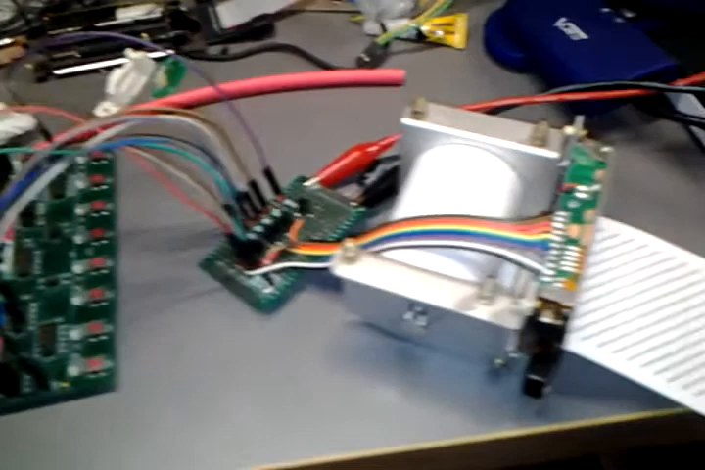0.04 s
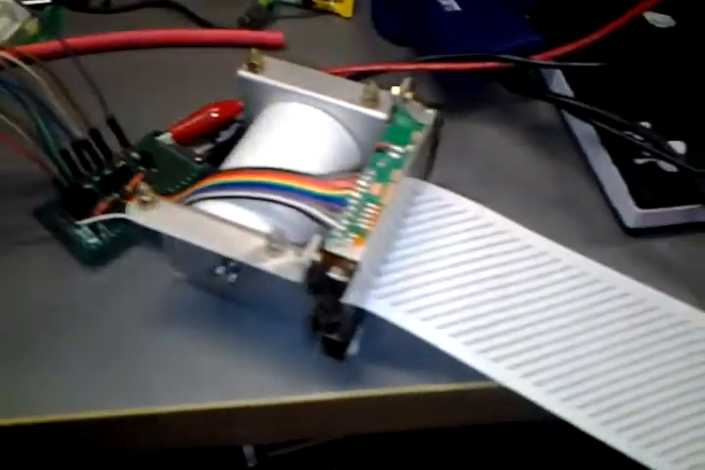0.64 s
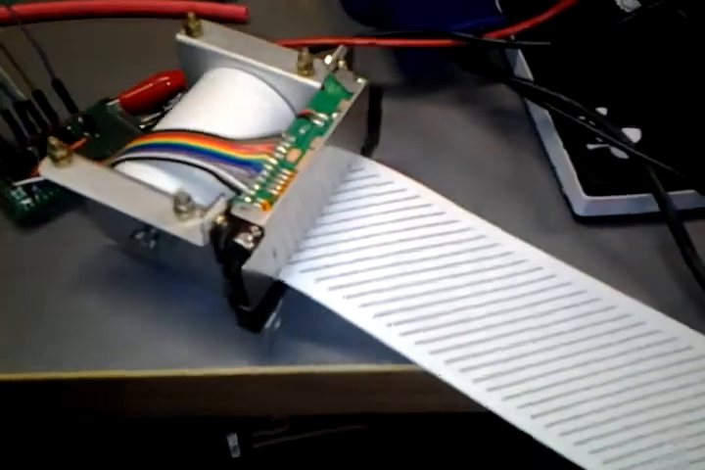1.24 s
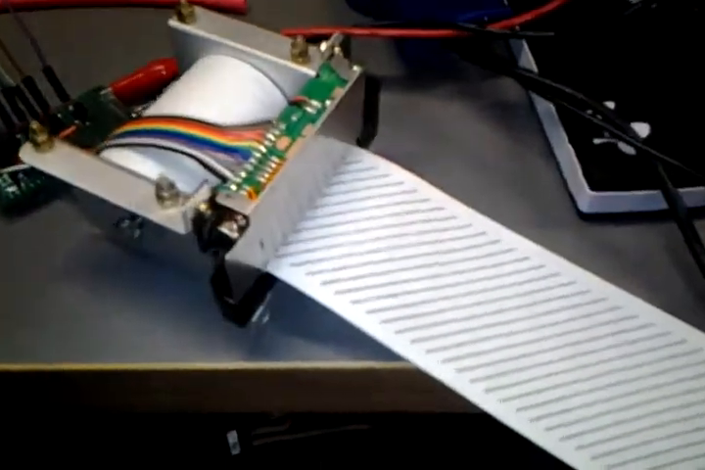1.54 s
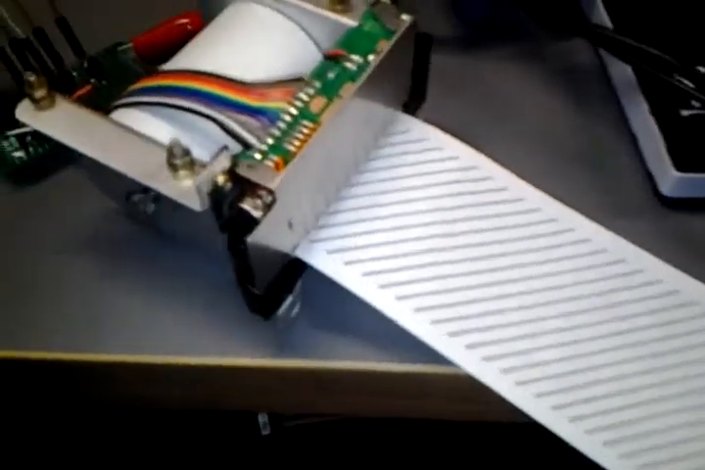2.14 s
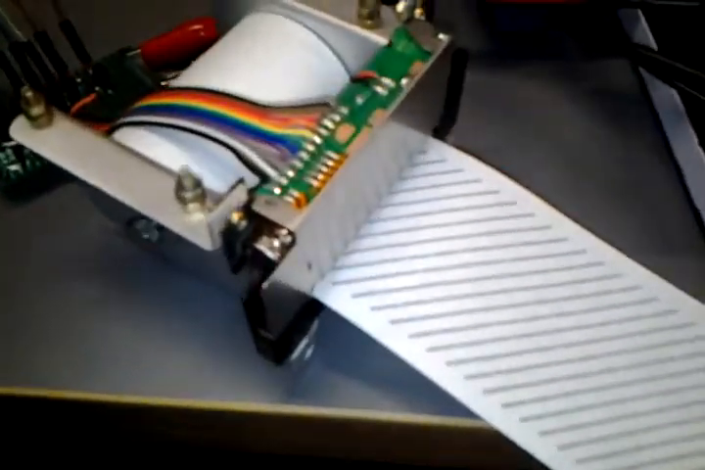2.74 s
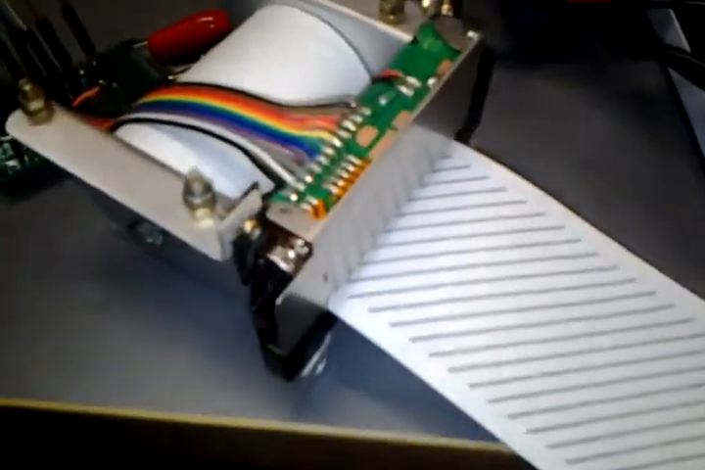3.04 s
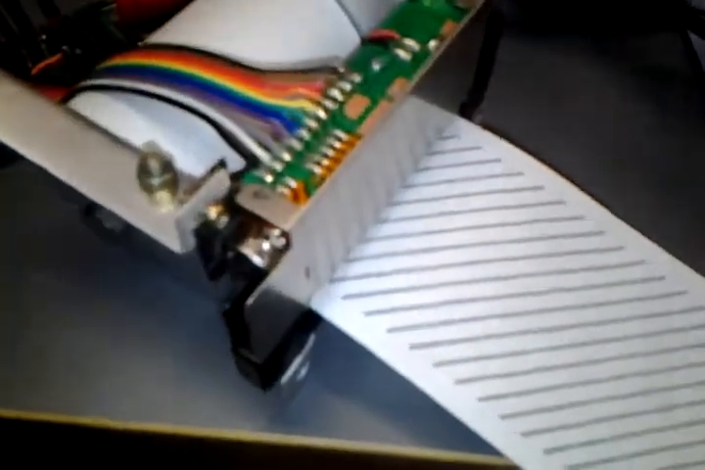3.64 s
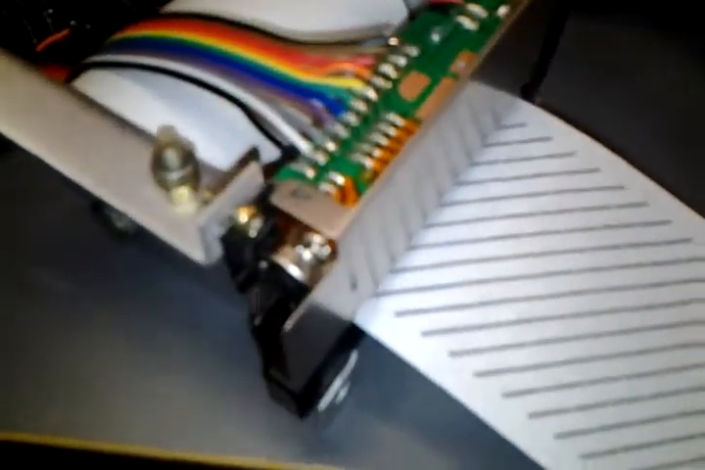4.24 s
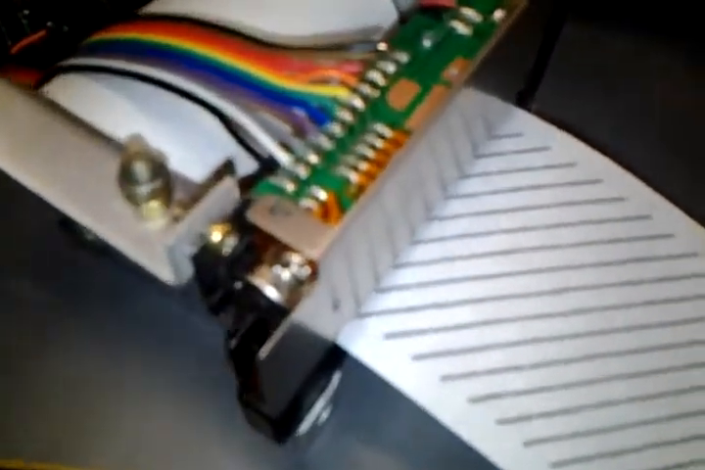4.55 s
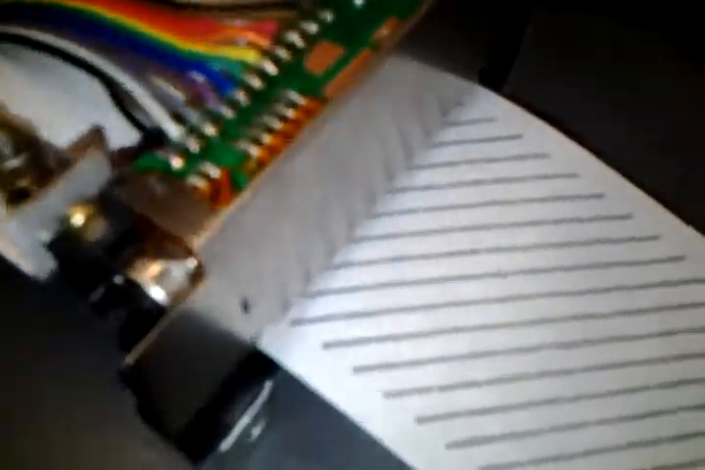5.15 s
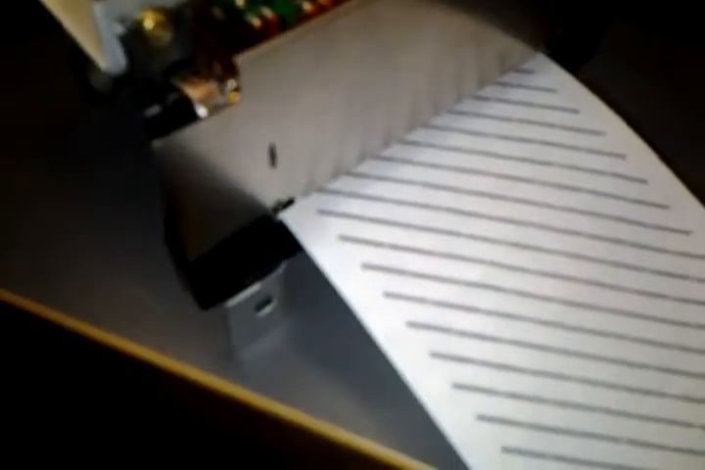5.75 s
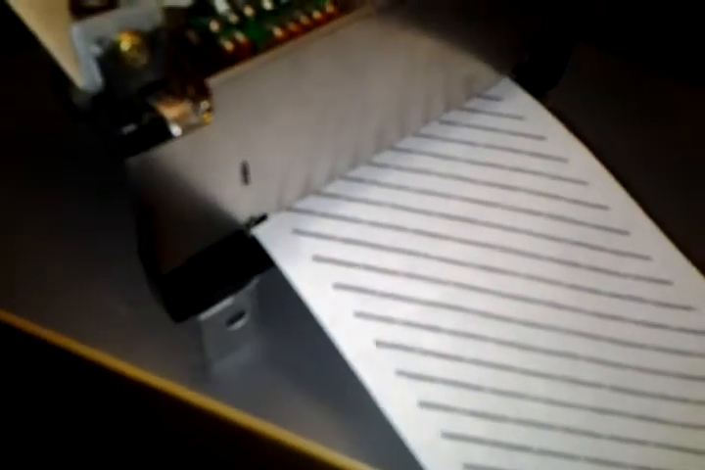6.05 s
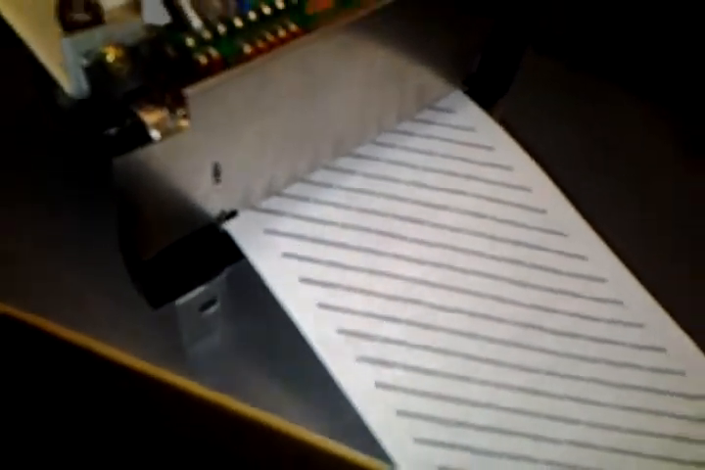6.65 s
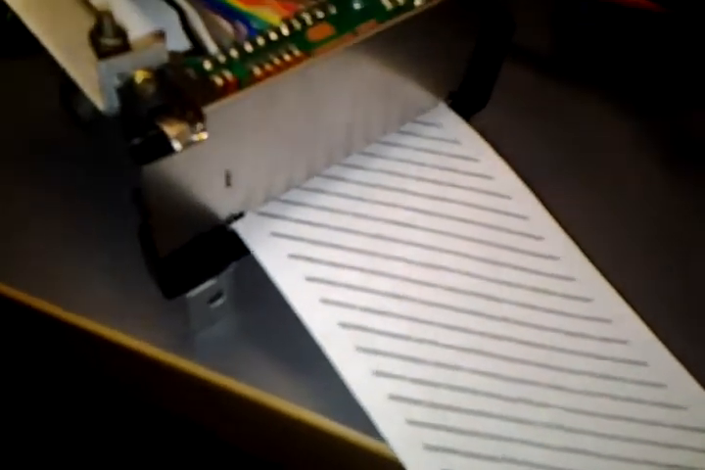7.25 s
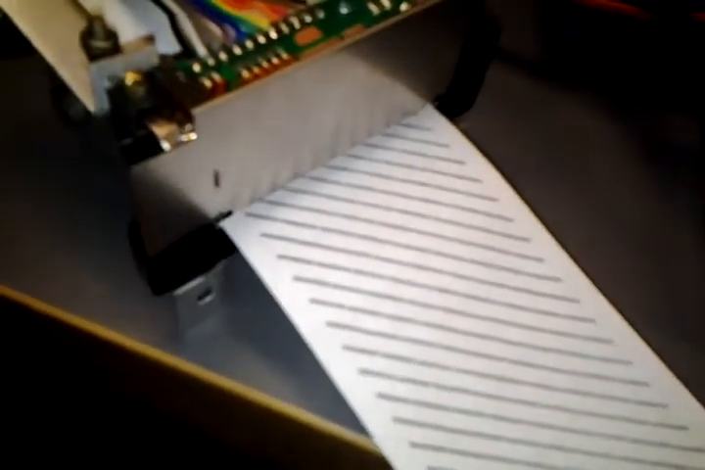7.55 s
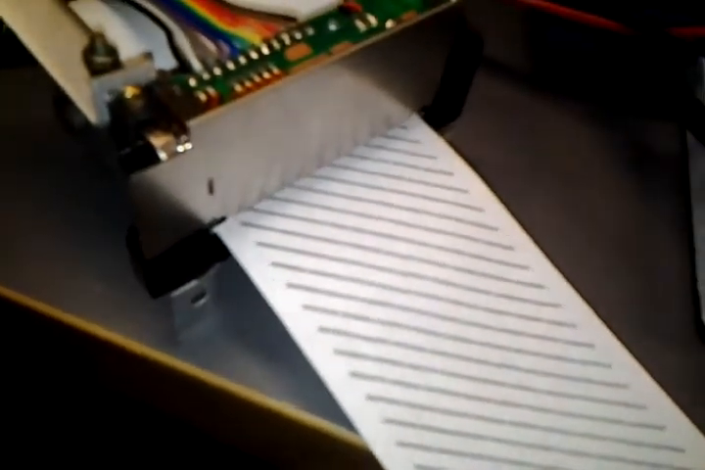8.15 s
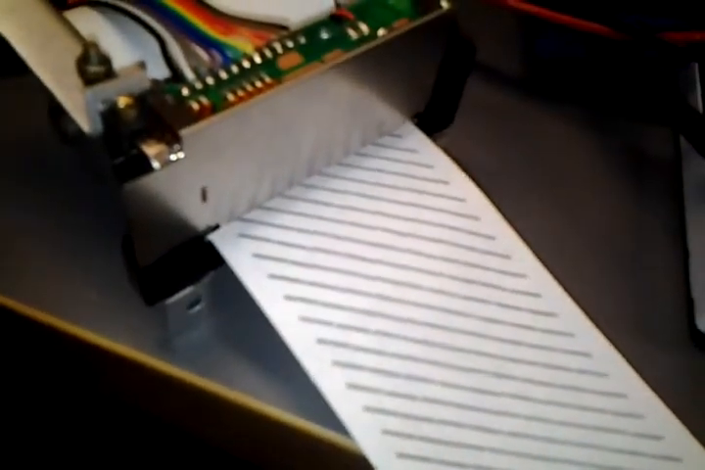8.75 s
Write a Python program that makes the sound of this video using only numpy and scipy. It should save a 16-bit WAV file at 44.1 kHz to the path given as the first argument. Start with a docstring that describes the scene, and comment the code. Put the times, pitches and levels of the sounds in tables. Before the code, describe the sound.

A small dot-matrix printer buzzes in rapid, regular metallic bursts, close by, over a faint motor hum.

```python
"""A small shuttle dot-matrix printer on a workbench, printing diagonal stripes on till paper.
Four solenoids on a swaying shuttle fire in turn: each dot line is a buzz of needle strikes that ring
the metal frame. The gears whine as the shuttle swings back, a pawl clicks the paper on, the motor hums.
The microphone is handheld, close by and wandering closer, with bench echoes and a faint room behind."""
import sys
import numpy as np
from scipy import signal
from scipy.fft import rfft, irfft
from scipy.io import wavfile

SR = 44100
rng = np.random.default_rng(int(sys.argv[2]) if len(sys.argv) > 2 else 0)


def unload_wav(signal):
    """Save mono or channel-first audio to the path in sys.argv[1] as 16-bit WAV at rate SR, clipped to [-1, 1]."""
    wavfile.write(
        sys.argv[1],
        SR,
        np.round(np.clip(np.atleast_2d(signal).T, -1, 1) * 32767).astype(np.int16),
    )


N = 388080
TIME = np.arange(N) / SR

# the microphone moving in on the printer: time_s, closeness (0 far, 1 close), level_db
MICROPHONE_PATH = [(0, 0, -4), (.8, 0.18, -4), (1.8, 0.61, -1), (2.8, .67, 0.1), (4, 0.69, 0.43),
                   (5, .8, .9), (5.9, 0.97, 1.4), (7, 0.84, .5), (8.8, .87, 0.95)]


def from_db(db):
    """Decibels to gain."""
    return 10 ** (np.asarray(db) / 20)


def rms_one(x):
    """Scale to an rms of 1."""
    return x / np.sqrt(np.mean(x ** 2) + 1e-20)


def at_hz(points, values, hz):
    """A spectrum read on a log-frequency axis."""
    return np.interp(np.log(hz + 1e-9), np.log(points), values)


def drift(rate_hz):
    """A random wander with an rms of 1."""
    knots = rng.standard_normal(4096)
    return rms_one(np.interp(TIME * rate_hz, np.arange(len(knots)), knots))


def resonance(x, hz, t60):
    """One ringing mode with a gain of 1 at its peak."""
    r = from_db(-60 / (t60 * SR))
    feedback = [1, -2 * r * np.cos(2 * np.pi * hz / SR), r * r]
    return signal.lfilter(np.array([1, 0, -1]) * (1 - r * r) / 2, feedback, x + 1e-18)


def place(times, sounds):
    """Lay short sounds, one a row, on the time line."""
    at = (times * SR).astype(int)[:, None] + np.arange(sounds.shape[1])
    inside = (at >= 0) & (at < N)
    return np.bincount(at[inside], sounds[inside], N)


def causal(level_db):
    """Minimum-phase spectra for rows of levels: nothing sounds before the blow."""
    cepstrum = irfft(np.log(from_db(level_db)))
    half = cepstrum.shape[1] // 2
    cepstrum[:, 1:half] *= 2
    cepstrum[:, half + 1:] = 0
    return np.exp(rfft(cepstrum))


def along_paper(across, count, size=13):
    """Smooth random shapes over the paper's width, of spread about 1, read where each needle lands."""
    angle = np.pi * np.arange(1, size)[:, None] * across
    return (rng.standard_normal((count, size - 1)) @ np.cos(angle)).T * np.sqrt(2 / size)


def line_starts(first_s=-0.01615, period_s=0.18278, count=49):
    """One dot line for each turn of the shuttle cam."""
    # the motor runs a little ahead of or behind its beat: time_s, late_ms
    lateness = [(0, .6), (.6, -.25), (2.9, .6), (4.4, -.2), (5.3, -1.4), (6.2, -1), (6.7, .2), (8.1, 1.1),
                (8.8, .2)]
    beat = first_s + period_s * np.arange(count)
    return beat + np.interp(beat, *np.transpose(lateness)) / 1000


def room(x, bench_t60=0.03, room_t60=0.198, tail_db=-10, first_echo_s=0.00065, positions=14):
    """Dense echoes off the cluttered bench and a faint room tail, shifting as the microphone moves."""
    t, out = TIME[:SR // 3], 0
    reached_s = np.linspace(0, TIME[-1], positions)
    for position in np.eye(positions):
        near, far = rng.standard_normal((2, len(t)))
        bench = rms_one(near * from_db(-60 * t / bench_t60))
        tail = from_db(tail_db) * rms_one(far * from_db(-60 * t / room_t60))
        echoes = (bench + tail) * np.clip(t / first_echo_s - 1, 0, 1)
        heard_here = x * np.sqrt(np.interp(TIME, reached_s, position))
        out = out + signal.oaconvolve(heard_here, echoes / np.linalg.norm(echoes))[:N]
    return out


def motor(whirr_db=-40, flutter=0.19, hum_waver=0.003, whirr_follows=0.42):
    """A fluttering whirr over wavering hum lines; the balance shifts as the microphone closes in."""
    # noise spectrum of motor and gear train: frequency_hz, level_db
    whirr_spectrum = [(25, 1.5), (60, -1), (160, -5.5), (250, 0), (350, 2.5), (395, 8), (470, -3),
                      (700, 3.5), (1100, 2), (1900, -0.5), (3100, -1), (4200, -6.5), (6300, -5),
                      (8000, -27.5)]
    # steady hum: pitch_hz, far_rms_db, close_rms_db
    hum_lines = [(119, -66, -65), (397, -51.5, -59.5), (439, -55.5, -60.5)]
    hz = np.arange(N // 2 + 1) * SR / N
    colour = from_db(at_hz(*np.transpose(whirr_spectrum), hz))
    whirr = rms_one(irfft(rfft(rng.standard_normal(N)) * colour, N))
    time_s, closeness, level_db = np.transpose(MICROPHONE_PATH)
    close = np.interp(TIME, time_s, closeness)
    whirr_gain = from_db(whirr_db + whirr_follows * np.interp(TIME, time_s, level_db))
    out = whirr_gain * whirr * (1 + flutter * drift(150))
    for pitch_hz, far_db, close_db in hum_lines:
        phase = 2 * np.pi * np.cumsum(pitch_hz * (1 + hum_waver * drift(11))) / SR
        out += np.sqrt(2) * from_db(far_db + (close_db - far_db) * close) * np.sin(phase)
    return out


def pawl(delay_s=0.1628, uneven_db=2, dull_hz=3800):
    """The paper feed clicks once between lines: a dulled impulse rings two short modes."""
    times = line_starts() + delay_s
    clicks = place(times, from_db(-31 + uneven_db * rng.standard_normal((len(times), 1))))
    clicks = signal.sosfilt(signal.butter(2, dull_hz, fs=SR, output="sos"), clicks)
    return 24 * resonance(clicks, hz=3350, t60=0.00063) + 16 * resonance(clicks, hz=1380, t60=0.006)


def gear_whine(trim_db=-1, waver=0.03566, rough=0.55):
    """The gears sing upward as the unloaded shuttle swings back, and sink as it is caught."""
    # the whine through one return stroke: since_line_start_s, pitch_hz, swell_db
    return_stroke = [(.112, 1248, -19), (0.127, 1352, -7), (.136, 1777, -9), (0.144, 1850, -2),
                     (.148, 1920, 0), (.154, 2100, -2.5), (.159, 1936, -12), (.165, 1611, -28.5)]
    # how strongly the whine reaches the microphone: time_s, level_db
    pickup = [(0, -38), (1.1, -34), (2.1, -39.5), (2.6, -36), (4.3, -29.5), (5.4, -29), (5.9, -35.5),
              (7.5, -37), (8.1, -32), (8.8, -40)]
    start = line_starts()
    line_db = np.interp(start, *np.transpose(pickup))
    line = np.maximum(np.searchsorted(start, TIME) - 1, 0)
    since = TIME - start[line]
    stroke_s, pitch_hz, swell_db = np.transpose(return_stroke)
    phase = 2 * np.pi * np.cumsum(np.interp(since, stroke_s, pitch_hz) * (1 + waver * drift(90))) / SR
    gain = from_db(trim_db + line_db[line] + np.interp(since, stroke_s, swell_db))
    # uneven teeth scratch the tone
    return gain * ((1 + rough * drift(500)) * np.sin(phase) + rough * drift(500) * np.cos(phase))


def frame(times, cracks, across, shape_share=0.45, drive_samples=160):
    """The strikes ring the frame; how strongly a mode answers depends on where the needle lands."""
    # modes of the metal frame: pitch_hz, level_db, t60_s
    modes = [(565, -1, 0.055), (708, 3.5, 0.043), (1258, -6.5, 0.033), (1390, -2, 0.029),
             (1604, -6.5, 0.028), (1660, -4, 0.055), (1812, -5, 0.036), (1860, -5, 0.049), (1999, 1, 0.042),
             (2220, -8, 0.032), (2330, -4.5, 0.031), (2517, -5, 0.034), (2870, -14, 0.1), (2944, -5, 0.024),
             (3230, -12, 0.04), (3340, -9.5, 0.06), (3527, -3.5, 0.028), (3720, -9, 0.049),
             (4230, -17.5, 0.045), (4470, -10.5, 0.057), (4600, -13, 0.026), (4910, -9, 0.036)]
    shapes, out = along_paper(across, count=len(modes), size=25).T, 0
    for (hz, level_db, t60), shape in zip(modes, shapes):
        drive = place(times, cracks[:, :drive_samples] * (1 + shape_share * shape)[:, None])
        out = out + from_db(level_db) * resonance(drive, hz, t60)
    return out


def microphone_colour(times, hz, paper_delay_s=0.000494, paper_share=0.16):
    """Level in dB by strike and frequency: near echoes make a comb that slides as the microphone moves."""
    # echoes off bench and chassis: far_delay_s, close_delay_s, far_share, close_share (both signed)
    near_echoes = [(.000066, 0.000414, -0.24, .21), (.00033, .000535, -0.34, -0.013),
                   (.000438, .000689, .13, .07)]
    # the treble rises and falls a little: time_s, level_db
    treble = [(0, 1), (.8, 2), (1.8, -1.4), (2.8, 0.9), (5, 0), (5.9, 1.1), (7, 1), (8.8, 0)]
    time_s, closeness, level_db = np.transpose(MICROPHONE_PATH)
    t = times[:, None]
    close = np.interp(t, time_s, closeness)
    # the paper adds one more echo as the microphone passes over it, around 6 s
    over_paper = np.exp(-((t - 6.0) / 0.98) ** 2)
    paths = 1 + paper_share * over_paper * np.exp(-2j * np.pi * hz * paper_delay_s)
    for far_s, close_s, far_share, close_share in near_echoes:
        delay_s = far_s + (close_s - far_s) * close
        share = far_share + (close_share - far_share) * close
        paths = paths + share * np.exp(-2j * np.pi * hz * delay_s)
    treble_db = np.interp(t, *np.transpose(treble)) * np.interp(hz, [5200, 6800], [0, 1])
    return np.interp(t, time_s, level_db) + 20 * np.log10(abs(paths) + 1e-3) + treble_db


def shuttle(solenoids=4, dots_each=36, stripe_period=16, first_row=12, slowest_row=2.6, sag=0.053):
    """Stripes three dots wide move on by one dot a line; the solenoids fire a quarter step apart."""
    # reach of each solenoid, the first two overlapping their neighbours by one dot: steps
    reach = (37, 37, 36, 36)
    start = line_starts()
    row = (np.arange(len(start)) + first_row) % stripe_period
    # the sweep lasts longer or shorter with the place of the stripes in their cycle
    sweep_s = 0.1078 + 0.0016 * np.cos(2 * np.pi * (row - slowest_row) / stripe_period)
    steps = np.arange(dots_each + 1)
    columns = dots_each * np.arange(solenoids)[:, None] + steps
    on_stripe = abs(columns % stripe_period - row[:, None, None]) <= 1
    line, solenoid, step = np.nonzero(on_stripe & (steps < np.array(reach)[:, None]))
    travel = (step + solenoid / solenoids) / dots_each  # share of the sweep
    across = columns[solenoid, step] / (solenoids * dots_each)  # share of the paper's width
    # the motor sags under the load of the solenoids
    times = start[line] + sweep_s[line] * (travel + sag * travel * (travel - 1))
    return times, solenoid, travel, across


def needles(times, solenoid, travel, across, uneven_db=0.58, lag_spread=0.2964, dispersion=0.05):
    """Each strike is a short crack with two rebounds, coloured by its solenoid and place on the platen."""
    # spectrum of one strike: frequency_hz, then level_db for each of the four solenoids
    strike_spectrum = [(400.0, -15.5, -16, -19, -19), (680, -4, -0.5, -6.5, -8.5),
                       (887, -0.5, -1.5, 1, -1.5), (1346, 13.5, 9.5, 12.5, 9), (1610, 14, 13, 4, 9.5),
                       (2423, 8.5, 10.5, 9.5, 4), (3150, 8, 15.5, 13.5, 3.5), (4065, 9, 11.5, 8.5, -2),
                       (4914, 9.5, 10, 8, 4), (5830, 5.5, 5.5, 7, 2), (6350, -3, 0.8, 4.5, 0),
                       (7115, 5.5, 0.5, -2.5, -2.5), (7850, -15.5, -15.5, -18, -16),
                       (7940, -19.5, -20, -22.5, -24)]
    # force of each solenoid over its quarter of the paper: sweep_start_db, sweep_end_db
    force = [(-0.5, 0.74), (0.5, 0.56), (1, 0.05), (3, -3)]
    # later contacts within one strike: delay_s, signed_share
    rebounds = [(.00038, 0.45), (.00095, -0.39)]
    hz = np.fft.rfftfreq(512, 1 / SR)
    points_hz, *colours = np.transpose(strike_spectrum)
    first_db, last_db = np.array(force)[solenoid].T
    force_db = first_db + (last_db - first_db) * travel + uneven_db * rng.standard_normal(len(times))
    level_db = np.array(colours)[solenoid] + force_db[:, None] + along_paper(across, len(points_hz))
    to_bins = np.array([at_hz(points_hz, point, hz) for point in np.eye(len(points_hz))])
    crack = causal(level_db @ to_bins + microphone_colour(times, hz))
    contacts = 1
    for (delay_s, share), shape in zip(rebounds, along_paper(across, len(rebounds), size=36).T):
        lag_s = delay_s * np.exp(lag_spread * shape)
        contacts = contacts + share * np.exp(-2j * np.pi * hz * lag_s[:, None])
    # bending waves in the metal carry the highs faster than the lows
    bending = np.exp(-2j * np.pi * dispersion * np.sqrt(hz))
    between_samples = np.exp(-2j * np.pi * hz * (times * SR % 1)[:, None] / SR)
    return irfft(crack * contacts * bending * between_samples)


def scene(head_db=-3.5, room_db=-7.5):
    """Strikes, frame, gears and pawl sound over the bench, in mono; the motor runs throughout."""
    times, solenoid, travel, across = shuttle()
    cracks = needles(times, solenoid, travel, across)
    head = from_db(head_db) * (place(times, cracks) + frame(times, cracks, across))
    # so small a mechanism radiates little bass
    head = signal.sosfilt(signal.butter(2, 420, "high", fs=SR, output="sos"), head)
    printer = head + gear_whine() + pawl()
    return (printer + from_db(room_db) * room(printer) + motor())[None]


def record(dry, band_hz=8634, overload=0.74, top_hz=16000):
    """A narrow-band microphone; the hardest strikes overload the input and spit a little treble."""
    narrow = signal.sosfilt(signal.ellip(10, 0.3, 80, band_hz, fs=SR, output="sos"), dry)
    clipped = np.clip(narrow, -overload, overload)
    return signal.sosfilt(signal.ellip(10, 0.1, 80, top_hz, fs=SR, output="sos"), clipped)


dry = scene()
out = record(dry)
unload_wav(out)
```